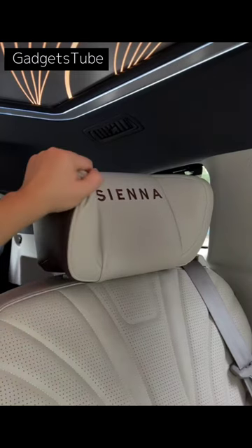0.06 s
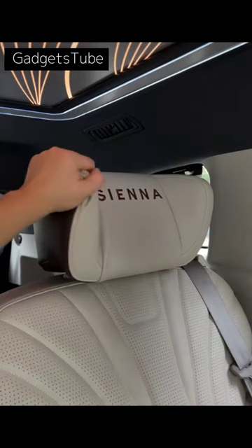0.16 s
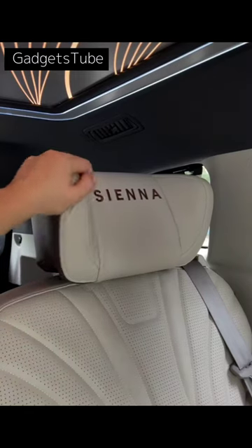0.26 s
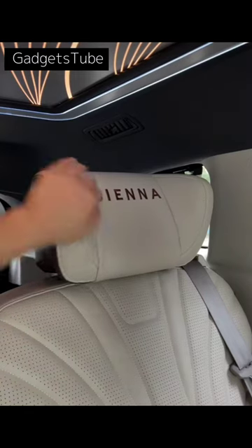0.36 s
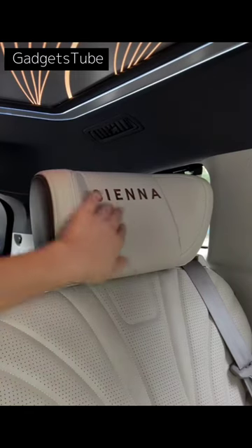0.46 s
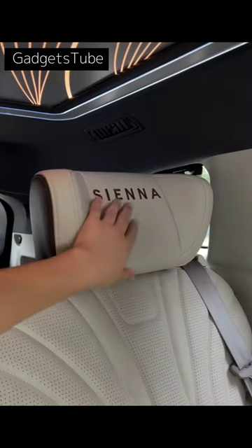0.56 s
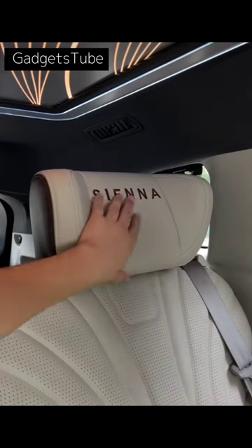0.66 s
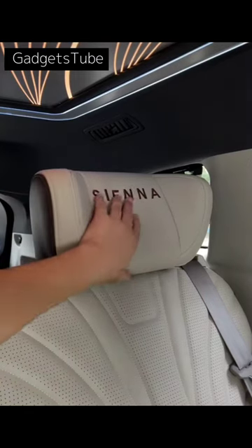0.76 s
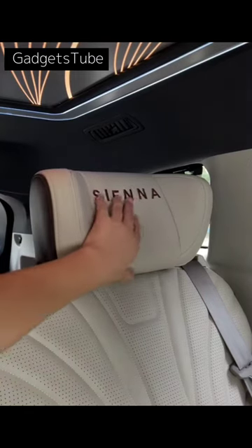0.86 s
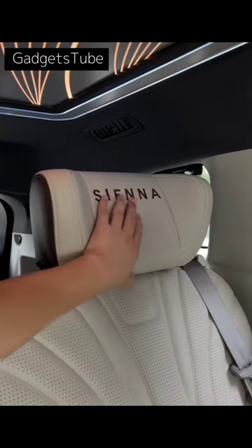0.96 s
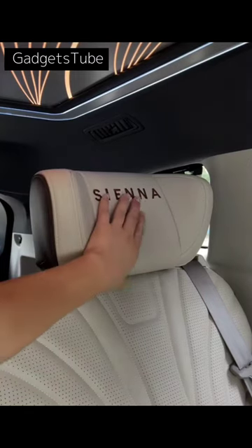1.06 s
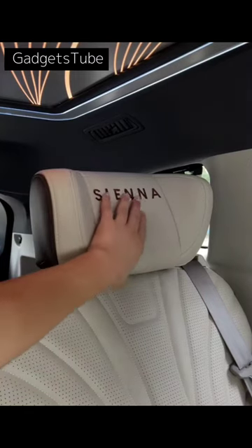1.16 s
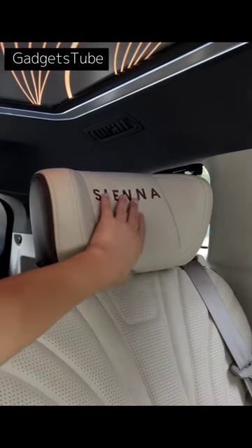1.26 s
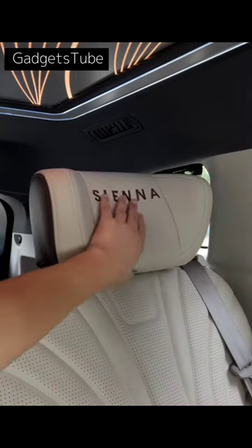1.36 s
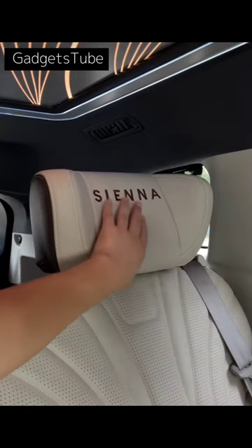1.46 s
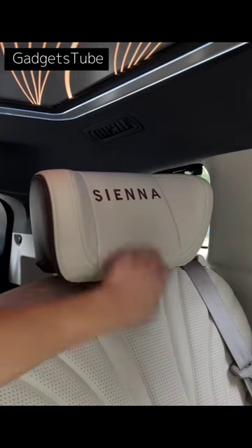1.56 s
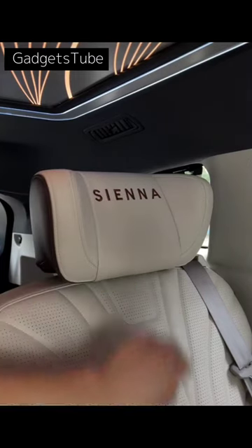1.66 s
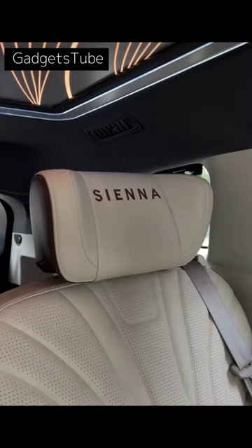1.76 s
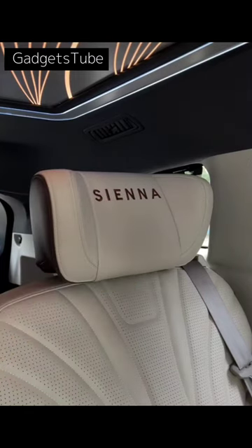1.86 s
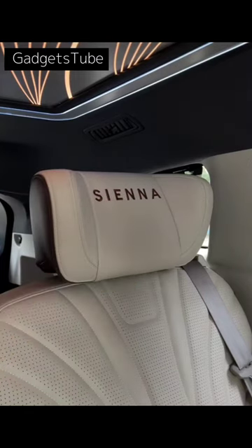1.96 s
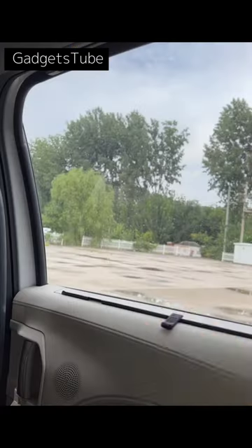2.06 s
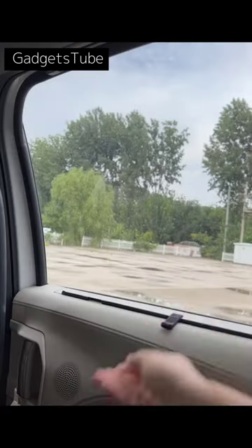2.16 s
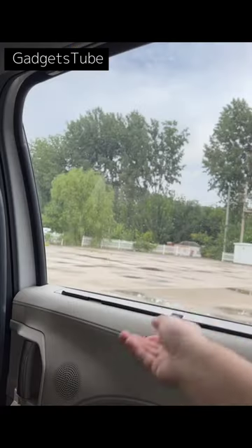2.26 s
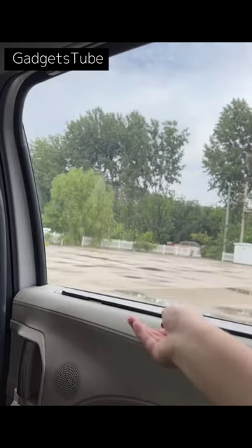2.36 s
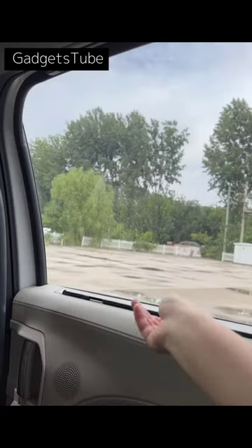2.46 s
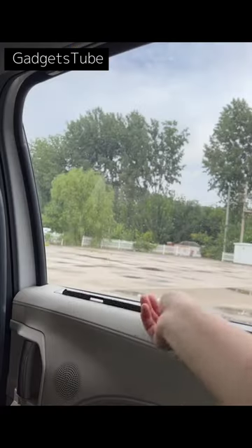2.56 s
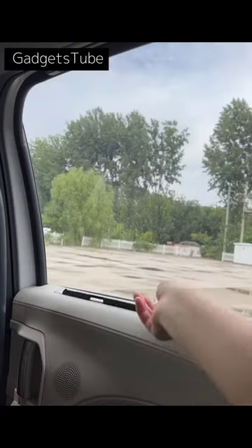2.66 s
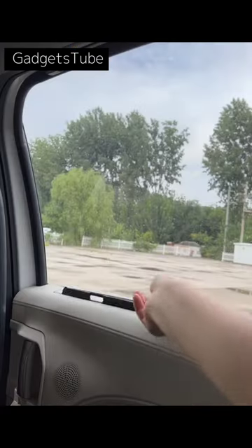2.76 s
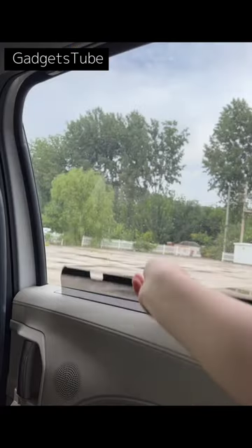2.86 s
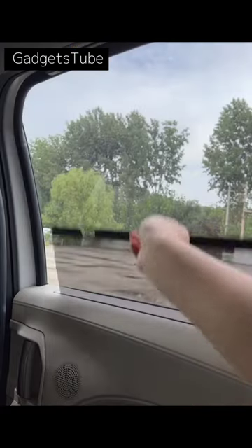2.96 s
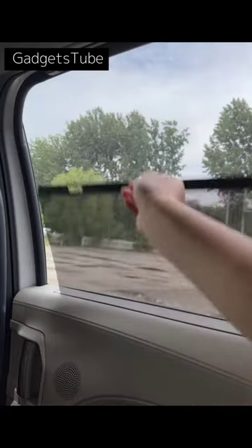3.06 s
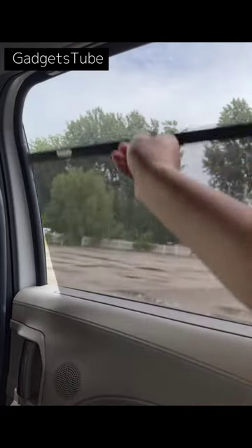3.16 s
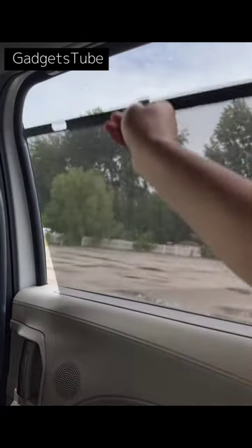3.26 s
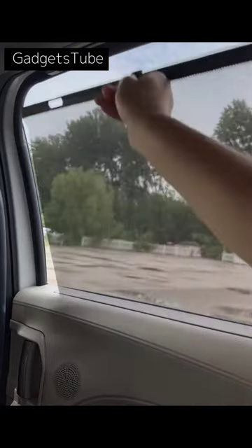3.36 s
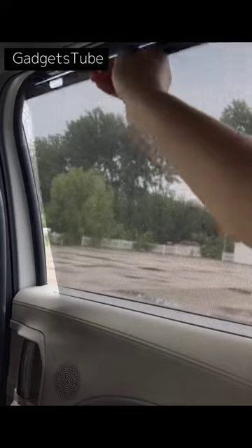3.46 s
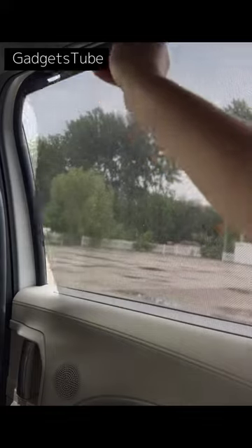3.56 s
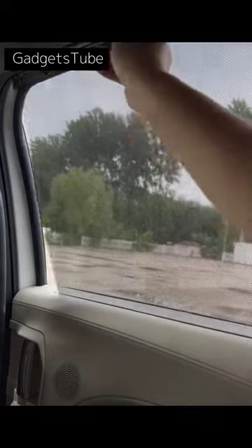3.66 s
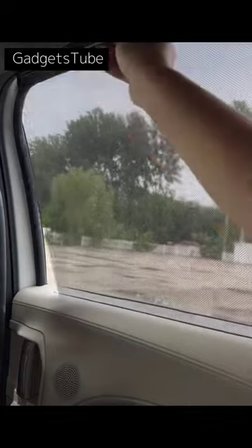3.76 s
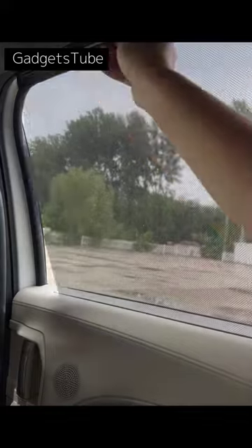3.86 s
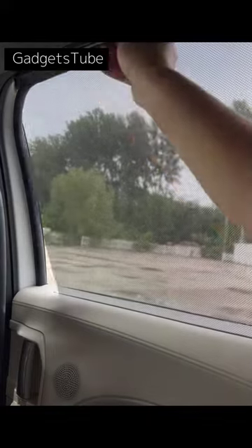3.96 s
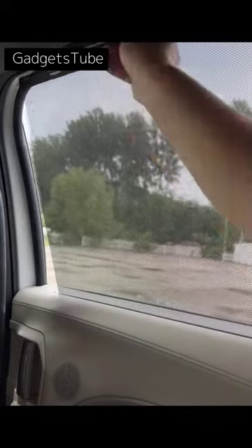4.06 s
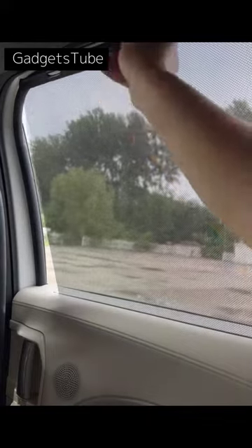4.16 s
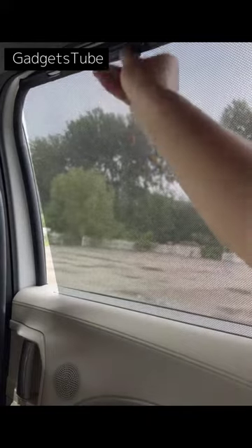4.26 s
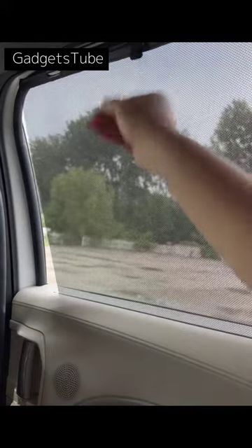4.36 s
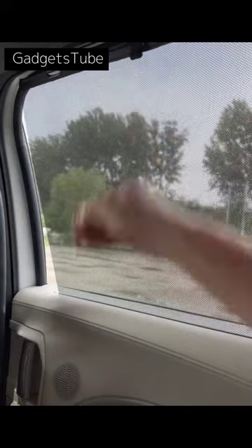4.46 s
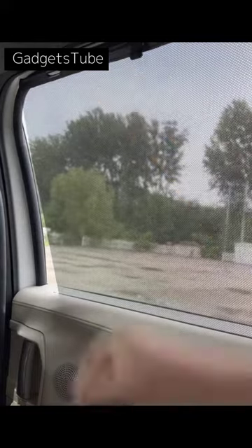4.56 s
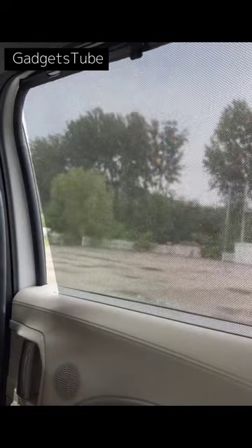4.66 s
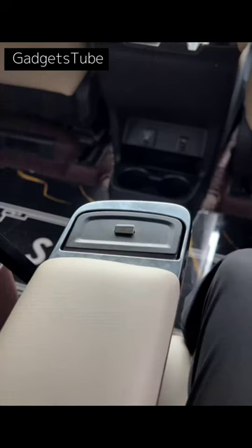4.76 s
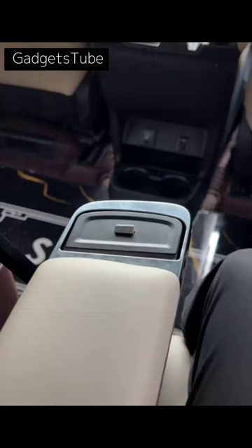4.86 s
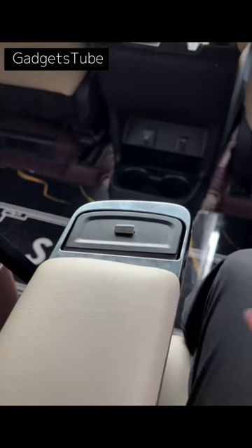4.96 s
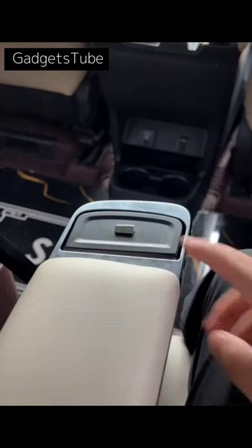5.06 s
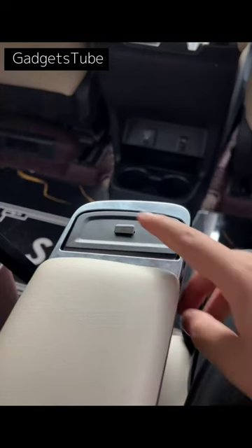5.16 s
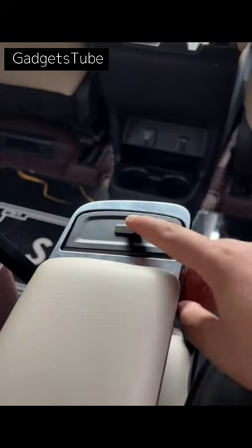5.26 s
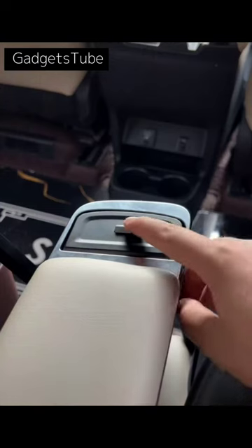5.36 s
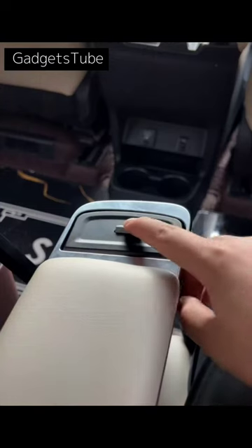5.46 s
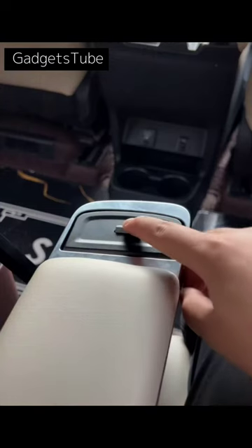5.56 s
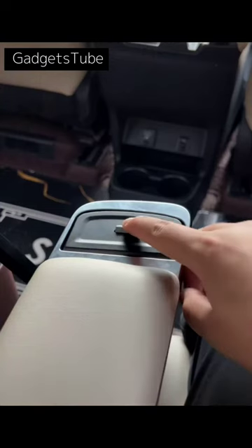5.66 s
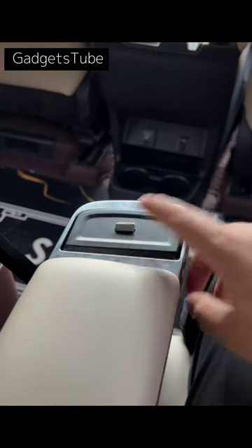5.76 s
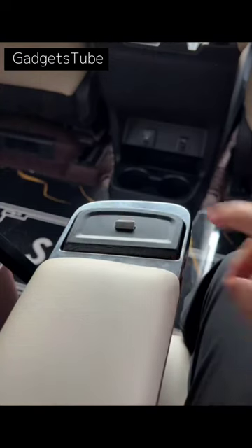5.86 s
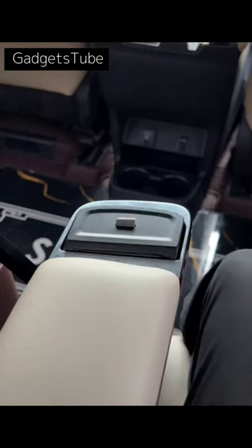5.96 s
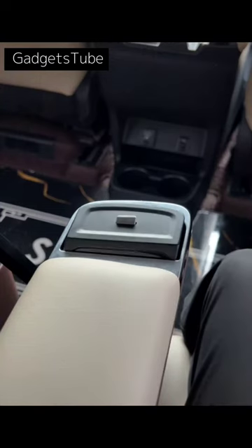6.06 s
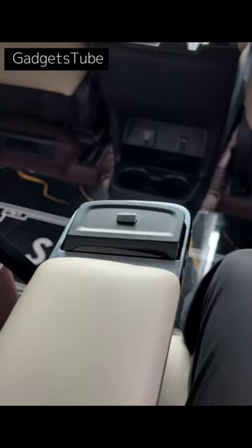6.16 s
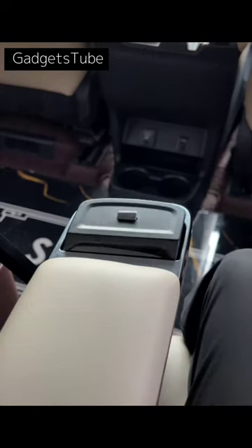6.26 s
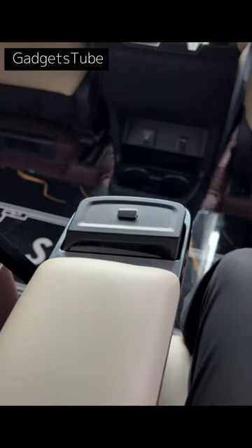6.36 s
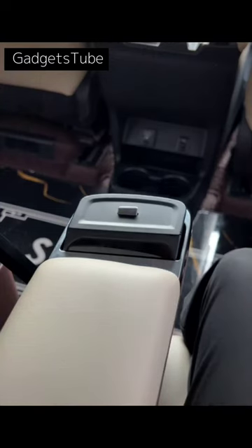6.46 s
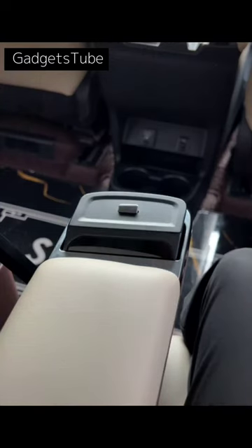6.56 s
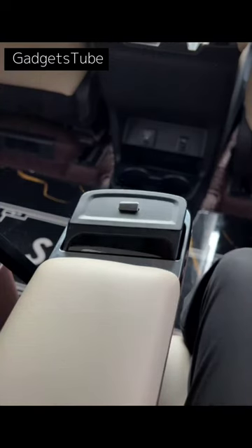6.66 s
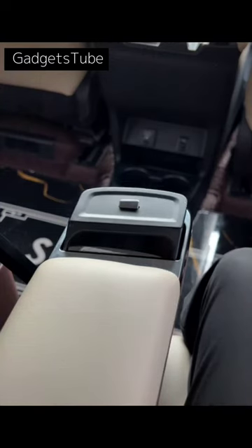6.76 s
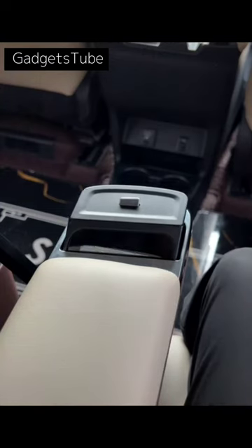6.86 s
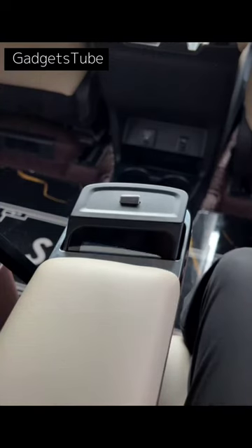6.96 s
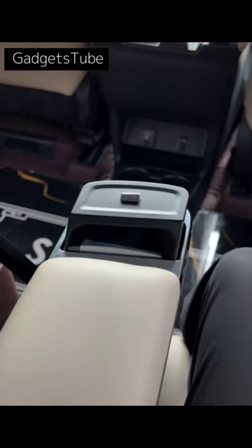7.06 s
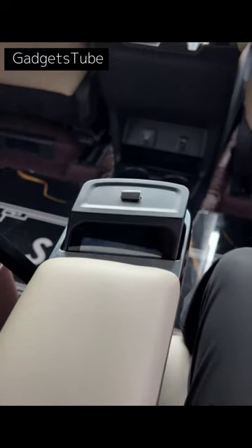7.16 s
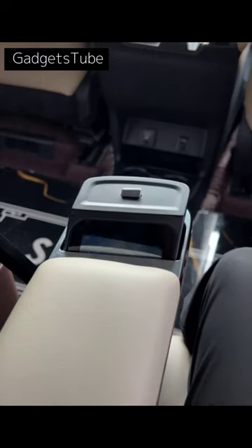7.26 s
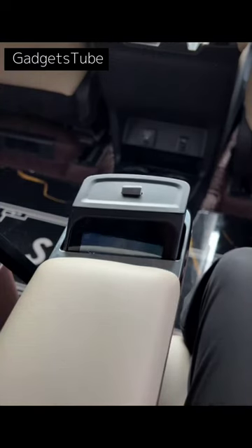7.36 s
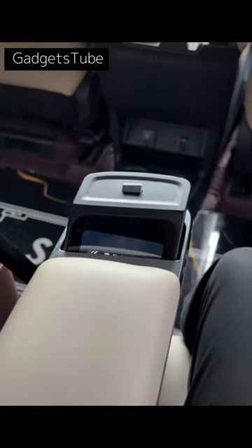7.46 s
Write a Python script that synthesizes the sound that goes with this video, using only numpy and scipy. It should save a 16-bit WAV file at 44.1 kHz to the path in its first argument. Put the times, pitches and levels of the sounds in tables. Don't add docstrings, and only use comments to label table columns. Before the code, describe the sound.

Inside a shut vehicle, close and dry with a very short padded echo, a low air boom lies under everything. From 0 to 2 seconds a hand slides over a leather headrest: a clear hiss around 0.3 to 0.6, then small ticks and soft padded thuds near 1.0 and 1.5. A tiny silent cut follows at 2.05. Knocks and low thumps at 2.3 to 2.7 mark fingers gripping a sunshade bar; from 2.8 to 3.6 mesh hisses upward over roller rumble and faint falling spring chirps. Bumps follow at 3.6 and 3.8, then the loudest hooking clack at 4.05, with light brushing afterward. Another cut comes at 4.75. A sleeve rustles faintly around 4.9; a button clicks at 5.6 and a latch snaps at 5.71. A small geared motor whines from 5.75 to the end, sagging slightly in pitch, with rubbery juddering and small squeaks between 6.0 and 6.9.

```python
import sys
import numpy as np
from scipy import signal
from scipy.fft import rfft, irfft, next_fast_len
from scipy.io import wavfile
from scipy.ndimage import uniform_filter1d

SR = 44100
rng = np.random.default_rng(int(sys.argv[2]) if len(sys.argv) > 2 else 0)


def bounce(signal):
    frames = np.transpose(np.atleast_2d(signal))
    limited = np.clip(frames, -1, 1)
    pcm = np.round(limited * 32767).astype(np.int16)
    wavfile.write(sys.argv[1], SR, pcm)


def makeup_ratio(level_db):
    decades = np.asarray(level_db, float) / 20
    return 10 ** decades


N = 331720
TIME = np.arange(N) / SR


def evened(x):
    return x / np.sqrt(np.mean(x ** 2) + 1e-20)


def read(points, hz):
    f, value = np.transpose(points)
    return np.interp(np.log(hz + 1), np.log(f + 1), value)


def track(rows, col, fade=0.003):
    s, db = np.transpose(rows)[[0, col]]
    inside_s = np.minimum(TIME - s[0], s[-1] - TIME)
    return makeup_ratio(np.interp(TIME, s, db)) * np.clip(inside_s / fade + 1, 0, 1)


def strokes_gain(rows, col, rise_s):
    t, rows = TIME[::32, None], np.array(rows)
    s, hold, fade = rows.T[:3]
    climb = np.maximum((s - t) / rise_s, 0) ** 1.5
    fall = np.maximum(t - s - hold, 0) / np.maximum(fade, 1e-3)
    each = makeup_ratio(np.maximum(rows[:, col] - 20 * (climb + fall), -200))
    return np.interp(TIME, t[:, 0], np.sqrt((each ** 2).sum(1)))


def wander(per_s):
    steps = rng.standard_normal(int(N / SR * per_s) + 2)
    return np.interp(TIME * per_s, np.arange(len(steps)), steps)


def sides(db):
    return makeup_ratio(np.array([[db], [-db]]) / 2)


def add(mix, s, sound):
    part = mix[:, round(s * SR):][:, :sound.shape[-1]]
    part += sound[..., :part.shape[1]]


# (frequency [Hz], likeness [0 to 1])
PORT_LIKENESS = [(130, 0.66), (290, 0.59), (600, 0), (1500, 0.91), (4000, 0), (5000, 0.063), (6500, 1),
                 (10500, 0)]


def noise(tone, span, size=512, patchy_db=2., grain_db=0., close=0.):
    start = max(round(span[0] * SR) - 500, 0)
    stop = min(round(span[1] * SR) + 500, N)
    hop, hz = size // 4, np.fft.rfftfreq(size, 1 / SR)
    a, b, c, d, patches = rng.standard_normal(((stop - start) // hop + 5, len(hz), 5)).T
    patches = evened(uniform_filter1d(uniform_filter1d(patches, size=6, axis=0), size=10, axis=1))
    likeness = np.clip(read(PORT_LIKENESS, hz), 0, 1)[:, None]
    same = 1 - (1 - likeness) * (1 - np.clip(close, 0, .8))
    left = a + 1j * b
    right = same * left + np.sqrt(1 - same ** 2) * (c + 1j * d)
    z = np.array([left, right]) * makeup_ratio(read(tone, hz)[:, None] + patchy_db * patches)
    x = signal.istft(z, nperseg=size, noverlap=size - hop)[1][:, :stop - start]
    grains = makeup_ratio(grain_db * wander(420)[start:stop])
    return np.pad(evened(x * grains), ((0, 0), (start, N - stop)))


def steadied(x, over_s=.12, share=0.47):
    width = int(over_s * SR)
    power = abs(uniform_filter1d(uniform_filter1d((x ** 2).mean(0), width), width))
    return evened(x / (power + .05) ** (share / 2)) / evened(x).std()


def rub(rows, rise_s, hiss, body, grain_db, close):
    span = rows[0][0] - 2 * rise_s, rows[-1][0] + rows[-1][1] + 2 * rows[-1][2]
    fine = noise(hiss, span, size=256, patchy_db=2.0, grain_db=grain_db, close=close)
    coarse = noise(body, span, patchy_db=1.8, grain_db=grain_db, close=close)
    return strokes_gain(rows, 3, rise_s) * fine + strokes_gain(rows, 4, rise_s) * coarse


# (from [s], to [s])
GAPS = [
    (2.05, 2.068),
    (4.749, 4.773),
]
# (frequency [Hz], level [dB])
BOOM_TONE = [
    [(35, -7.5), (65, 3.5), (95, -7.5), (128, 2.5), (165, -17), (270, -11.5), (440, -49), (1320, -120)],
    [(18, -47.5), (30, -35.5), (65, 4), (113, -8), (140, -11), (300, -31.5), (390, -64.5), (660, -120)],
    [(18, -43), (30, 8), (80, 5), (108, -7), (359, -33), (400, -36), (520, -36), (880, -120)],
]
REST_DB = [-36.5, -54.5, -53.5]
# (time [s], hold [s], fade by 20 dB [s], level [dB])
SHAKES = [
    (2.07, 0.0096, 0.13, -43),
    (2.44, 0.19, 0.22, -33.5),
    (2.98, 0.27, 0.18, -26),
    (3.33, 0.14, 0.48, -32),
    (3.86, 0.015, 0.053, -30),
    (4.12, 0.14, 0.17, -33),
    (4.74, 0.012, 0.022, -47.5),
    (5.15, 0.013, 0.067, -54),
]
# (frequency [Hz], level [dB])
HUSH = [(250, -4), (500, -11), (1300, -20), (1900, -15), (2600, -20), (9500, -27.5), (11000, -33.5),
        (12500, -76.5)]


def cabin_air():
    shaken = strokes_gain(SHAKES, col=-1, rise_s=0.17) + makeup_ratio(-17.5) * track(MOTOR_LOAD, 1)
    parts = np.r_[0, np.ravel(GAPS), N / SR].reshape(-1, 2)
    boom = 0
    for (a, b), db, tone in zip(parts, REST_DB, BOOM_TONE):
        air = steadied(noise(tone, (a - .2, b + 0.23), size=2048, patchy_db=2.0, close=0.98))
        during = (TIME >= a) & (TIME <= b + .008)
        boom = boom + during * np.hypot(makeup_ratio(db), shaken) * air
    return boom + makeup_ratio(-59.5) * noise(HUSH, (0, N / SR), patchy_db=0.0)


# (time [s], hold [s], fade by 20 dB [s], hiss level [dB], body level [dB])
LEATHER = [(0, 0.084, 0.17, -56.5, -52.5), (.27, 0.096, 0.45, -42, -42.5), (.47, 0.0048, 0.11, -34.5, -41),
           (.56, 0.13, 0.18, -49.5, -45.5), (1.03, 0.0052, 0.2, -48, -41.5),
           (1.14, 0.0091, 0.046, -55.5, -44.5), (1.27, .005, 0.08, -61, -43.5),
           (1.335, .01, 0.053, -59, -48), (1.425, .005, 0.028, -58, -47), (1.53, 0.0021, 0.035, -42.5, -30),
           (1.57, 0.024, 0.035, -36, -64)]
# (frequency [Hz], level [dB])
SKIN_HISS = [(710, -9.5), (1200, -11), (2650, -2.5), (4760, -5), (7630, -5.5), (11600, -18), (14000, -65)]
# (frequency [Hz], level [dB])
BODY = [(120, -17.5), (250, 8.5), (500, 2), (1000, -7), (1800, -13), (3500, -34.5)]


def hand_on_leather():
    return rub(LEATHER, 0.046, SKIN_HISS, BODY, grain_db=0.5, close=0.56)


# (time [s], peak [dB], fade by 60 dB [s], top frequency [Hz])
SNAPS = [(0.092, -41.5, 0.03, 2600), (0.22, -42, 0.013, 2500), (0.7945, -31.5, 0.012, 7800),
         (1.018, -38, 0.015, 5000), (0.978, -40, 0.022, 3470), (1.0106, -32, 0.043, 7650),
         (1.2493, -36, 0.011, 7500), (1.406, -37, 0.0076, 6000), (1.4116, -37.5, 0.028, 3000),
         (1.485, -36.5, 0.017, 2500), (1.5054, -30, 0.012, 4000), (2.357, -44, 0.011, 7000),
         (2.502, -35.5, .02, 6000), (2.676, -42, 0.017, 2170), (2.793, -51, 0.015, 2500),
         (3.807, -33, 0.01, 5000), (4.0455, -24.5, 0.009, 15000), (4.06, -28.5, 0.0074, 15380),
         (4.698, -53, 0.017, 2980), (5.711, -23.5, 0.009, 15100)]


def snaps():
    t, out = TIME[:1500], np.zeros((2, N))
    bursts = rng.standard_normal((len(SNAPS), len(t)))
    for burst, (s, db, t60, top_hz) in zip(bursts, SNAPS):
        crack = evened(signal.lfilter(*signal.butter(2, [900, top_hz], "band", fs=SR), burst))
        add(out, s, makeup_ratio(db - 7 - 60 * t / t60) * crack)
    return out


# (time [s], peak [dB], centre frequency
# [Hz], fade by 60 dB [s])
TICKS = [(0.795, -39, 3920, 0.027), (0.8, -53, 1820, 0.51), (.1, -44, 1960, 0.22),
         (1.322, -41.5, 1270, 0.067), (1.0082, -33, 1790, 0.024), (1.249, -47, 4100, 0.018),
         (1.34, -39, 1310, 0.023), (1.109, -38, 1000, 0.036), (1.4048, -40, 1350, 0.031),
         (1.506, -39, 1676, 0.032), (2.502, -19, 930, 0.025), (3.568, -22, 1050, 0.034),
         (2.544, -15, 1440, 0.011), (3.8204, -33, 1446, 0.025), (4.04, -19, 897, 0.033),
         (4.0609, -8.5, 1556, 0.021), (5.2996, -45, 1700, 0.033), (5.463, -34, 2600, 0.02),
         (5.596, -4, 1693, 0.02), (5.7105, -5, 2340, 0.061), (5.7117, -13, 1670, 0.053),
         (5.729, -10, 2320, 0.0093), (5.743, -10.5, 2160, 0.064),
         (2.844, -24.5, 1380, 0.024), (2.861, -19, 970, 0.043), (3.844, -35.5, 900, 0.048),
              (3.636, -40, 5200, 0.02), (3.804, -39, 6060, 0.014), (4.046, -26.5, 6700, 0.021),
              (4.0615, -5, 3520, 0.016), (5.421, -45, 1820, 0.076), (5.43, -34.5, 2780, 0.027),
              (5.444, -26, 2430, 0.024), (5.588, -33, 2454, 0.015), (5.704, -17, 1480, 0.071)]


def ticks():
    out, t, rows = np.zeros((2, N)), TIME[:5000], TICKS
    bursts = rng.standard_normal((len(rows), len(t)))
    for burst, (s, db, hz, t60) in zip(bursts, rows):
        wide = np.clip(1 + db / 60, .25, 1)
        band_hz = [hz / (1 + 1.13 * wide), min((1 + 0.62 * wide) * hz, 9000)]
        ring = signal.lfilter(*signal.butter(2, band_hz, "band", fs=SR), burst)
        edge = 0.44 * wide * uniform_filter1d(burst, size=3) * makeup_ratio(-60 * t / 0.0056)
        fading = makeup_ratio(-60 * t / t60) + 0.074 * makeup_ratio(-60 * t / (6.7 * t60))
        sound = (edge + ring * fading) * np.minimum(t / 0.001, 1)
        add(out, s, makeup_ratio(db) * sound / abs(sound).max())
    return out


# (time [s], peak [dB], panel frequency [Hz], fade by 60 dB [s])
KNOCKS = [(1.015, -11.5, 253, 0.03), (1.517, -15, 184, 0.055), (2.282, -31.5, 328, 0.045),
          (2.358, -18.5, 202, 0.1), (2.505, -15.5, 193, 0.07), (2.546, -3, 449, 0.026),
          (2.569, -13, 423, 0.037), (3.575, -8, 402.4, 0.04), (3.666, -9.5, 276, 0.076),
          (3.82, -12, 193, 0.041), (3.842, -13.5, 215, 0.032), (4.0448, 5.5, 241.6, 0.048),
          (4.0667, -4, 202.5, 0.061), (4.7, -23.5, 256, 0.025), (5.712, 1.5, 555, 0.019),
          (5.716, -5.5, 733, 0.066), (5.729, 4, 352, 0.017), (5.743, -12.5, 821, 0.06),
          (5.757, -11, 204, 0.067)]


def knocks():
    out, t = np.zeros((2, N)), TIME[:16000]
    modes = [(0.996, 0.97), (.7, 0.34), (1.393, 0.6), (2.25, 0.76)]
    for s, db, hz, t60 in KNOCKS:
        ring = sum(share * np.sin(2 * np.pi * hz * k * t) * makeup_ratio(-60 * k * t / t60) for k, share in modes)
        add(out, s, makeup_ratio(db + 1.5) * np.minimum(t / 0.004, 1) * ring)
    return out


# (time [s], peak [dB], frequency [Hz], fade by 60 dB [s])
PINGS = [
    (1.248, -43, 4090, 0.038),
    (3.638, -27, 5500, 0.017),
    (4.0465, -10, 6750, .012),
    (4.0615, -13, 4270, 0.026),
    (4.061, -13.5, 6070, 0.025),
    (4.065, -9, 1520, 0.018),
    (4.071, -18.5, 1796, 0.048),
    (4.077, -25, 6820, 0.02),
]


def pings():
    out, t = np.zeros((2, N)), TIME[:3000]
    for s, db, hz, t60 in PINGS:
        add(out, s, makeup_ratio(db - 60 * t / t60) * np.minimum(t / 0.00072, 1) * np.sin(2 * np.pi * hz * t))
    return out


# (time [s], hold [s], fade by 20 dB [s], hiss level [dB], body level [dB])
FABRIC = [(2.078, 0.02, 0.033, -44.5, -35), (2.45, .03, 0.04, -60, -45), (2.503, 0.0091, 0.12, -47, -34),
          (2.57, 0.081, 0.016, -51.5, -35), (2.69, 0.003, 0.023, -62, -41), (3.6, 0.043, 0.041, -46.5, -51),
          (3.664, 0.0054, 0.026, -39, -22.5), (3.822, 0.006, 0.05, -54, -34),
          (3.85, 0.0054, 0.028, -57, -47.5), (4.07, 0.0062, 0.021, -26, -24),
          (4.222, 0.004, 0.063, -49.5, -42.5), (4.29, 0.012, 0.022, -53.5, -53),
          (4.71, 0.0064, 0.019, -92, -44.5), (4.742, .005, .02, -50, -45)]
# (frequency [Hz], level [dB])
CLOTH_HISS = [(710, -20), (1200, -0.5), (3220, -6), (7480, -9.5), (11100, -28.5), (12600, -10.5),
              (14000, -55.5)]


def cloth_brushes():
    return rub(FABRIC, 0.028, CLOTH_HISS, BODY, grain_db=1.5, close=0.95)


# (time [s], peak [dB], frequency [Hz], fade by 60 dB [s])
THUMPS = [(2.371, -4, 106.4, 0.063), (2.507, -17, 530, 0.025), (5.6033, -29.5, 372, 0.062),
          (2.586, -4.5, 85, 0.033), (2.6454, -4, 94, 0.02), (3.583, -12, 102.8, 0.077),
          (3.665, 2, 203, 0.07), (3.63, -2, 198, 0.025), (3.569, -18, 1020, 0.032), (2.7, -25, 1100, 0.047),
          (2.858, -21.5, 622, 0.074), (3.82, -21.5, 780, 0.028), (5.44, -36.5, 216, 0.038),
          (5.61, -27, 217, 0.1), (3.75, -6.5, 92, 0.2), (3.74, -8.5, 64, 0.16), (4.052, -3.5, 112, 0.24),
          (4.1, -2.5, 76, 0.14), (4.1, -27, 71.2, 0.46), (4.101, -9, 109, 0.067), (4.1165, -9.5, 90.6, .06),
          (4.1306, 1, 87.6, 0.026), (4.712, -24, 157, 0.056), (4.732, -23.5, 99, 0.057),
          (4.688, -35, 385, 0.053), (5.758, -24, 119, 0.18)]


def thumps():
    out, t = np.zeros((2, N)), TIME[:16000]
    for s, db, hz, t60 in THUMPS:
        add(out, s, makeup_ratio(db - 60 * t / t60) * np.minimum(t / 0.0044, 1) * np.sin(2 * np.pi * hz * t))
    return out


# (frequency [Hz], fade by 60 dB [s])
CABIN = [(60, 0.22), (250, 0.21), (1000, 0.062), (8000, 0.085)]


def cabin(x):
    taps = np.zeros((2, 12000))
    at = np.arange(100, 11960, 20) + rng.integers(0, 20, (2, 593))
    np.put_along_axis(taps, at, rng.choice([-1., 1.], at.shape), 1)
    taps[1] = 0.91 * taps[0] + 0.59 * taps[1]
    hz, t, z = signal.stft(taps, SR, nperseg=256)
    dying = makeup_ratio(-60 * t / read(CABIN, hz)[:, None])
    bass_cut = np.minimum(hz / 450 + 0.06, 1)[:, None]
    tail = signal.istft(z * dying * bass_cut, SR, nperseg=256)[1]
    return signal.fftconvolve(x.mean(0)[None], tail / np.linalg.norm(tail[0]), axes=1)[:, :N]


# (time [s], level [dB])
PULL = [
    (2.79, -76),
    (2.824, -42),
    (2.9, -34),
    (2.97, -39.5),
    (3.05, -33),
    (3.2, -35),
    (3.5, -40),
    (3.6, -44.5),
]
# (time [s], hold [s], fade by 20 dB [s], level [dB])
ROLLER = [
    (2.83, 0.763, 0.033, -31),
    (2.86, 0.0056, 0.072, -30),
]
# (frequency [Hz], level [dB])
MESH_HISS = [(710, -17), (1200, -24), (2160, -4.5), (5010, -5), (8200, -11), (11300, -19.5), (12500, -18),
             (14000, -76)]
# (frequency [Hz], level [dB])
MESH_BODY = [(88, -2), (150, -1.5), (261, 2), (463, 2), (722, -5.5), (2000, -10), (2600, -12.5),
             (4400, -120)]


def shade():
    span = PULL[0][0] - .05, PULL[-1][0] + .05
    hiss = noise(MESH_HISS, span, size=256, patchy_db=0.0, grain_db=-5.0, close=1.0)
    rumble = noise(MESH_BODY, span, size=1024, patchy_db=1.5, grain_db=0.2, close=1.0)
    return track(PULL, 1) * hiss + strokes_gain(ROLLER, -1, rise_s=0.028) * rumble + chirps()


# (time [s], length [s], from frequency [Hz], to frequency [Hz], level [dB])
CHIRPS = [(3.017, .07, 610, 576, -41), (3.2, .09, 1170, 860, -47), (3.055, .06, 1170, 1060, -49),
          (3.1, .08, 1010, 960, -45), (3.12, .15, 510, 330, -46), (3.37, .054, 500, 460, -44),
          (3.42, .043, 445, 470, -45), (3.47, .042, 480, 440, -44), (3.4, .1, 701, 660, -51),
          (3.015, .045, 1850, 1800, -52), (3.05, .045, 1710, 1680, -51), (3.13, .04, 2150, 2090, -53),
          (3.19, .04, 2100, 2050, -52), (3.26, .07, 590, 560, -47), (3.175, .045, 830, 790, -47),
          (3.3, .07, 885, 860, -51), (3.12, .07, 1520, 1380, -54), (3.345, .05, 1740, 1710, -53),
          (3.335, .05, 2720, 2700, -56), (6.31, .035, 3440, 3400, -52), (6.22, .04, 3430, 3400, -56),
          (6.324, .05, 695, 685, -44), (6.74, .05, 1140, 1130, -55), (5.08, .18, 2050, 1950, -78)]


def chirps():
    out, tremble = np.zeros((2, N)), 1 + .007 * wander(150)
    for s, length, from_hz, to_hz, db in CHIRPS:
        hz = np.linspace(from_hz, to_hz, int(length * SR))
        hz = hz * tremble[round(s * SR):][:len(hz)]
        whistle = np.sin(2 * np.pi * np.cumsum(hz) / SR)
        add(out, s, makeup_ratio(db + 15) * np.hanning(len(hz)) * whistle)
    return out * makeup_ratio(2 * wander(60))


# (time [s], hold [s], fade by 20 dB [s], hiss level [dB], body level [dB])
SLEEVE = [
    (4.79, 0.024, .08, -62, -82),
    (4.9, 0.085, 0.2, -50.5, -80),
    (5.03, 0.048, 0.1, -57, -81),
]
# (frequency [Hz], level [dB])
SLEEVE_HISS = [(700, -11.5), (1700, -3.5), (2600, -6), (4500, -8), (7000, -3), (9500, -9.5), (11600, -13),
               (14000, -70)]


def sleeve():
    return rub(SLEEVE, 0.051, SLEEVE_HISS, BODY, grain_db=-2.0, close=0.2)


# (time [s], speed [turns per s])
SPEED = [(5.8, 86.6), (6.6, 85.9), (7.2, 84.9), (7.52, 83.6)]
# (time [s], level [dB])
MOTOR_LOAD = [
    (5.75, -38),
    (5.85, -33),
    (6.3, -28),
    (6.9, -30),
    (7.52, -32),
]
# (multiple, level [dB])
FREE = [(1, -15), (2, -2.5), (3, -35), (4, -1), (5, -31), (6, -10), (7, -13.5), (8, -9), (9, -26),
        (10, -5.5), (11, -41), (12, -22.5), (13, -17), (14, -16), (15, -20), (16, -12), (17, -14), (18, -8),
        (19, -8.5), (20, -8), (21, -18.5), (22, -20), (23, -9), (24, 1.5), (25, -17.5), (26, -25),
        (27, -9.5), (28, -12), (29, -10), (30, -12.5), (31, -16), (32, -25), (33, -13), (34, -19),
        (35, -30), (36, -15.5), (37, -31), (38, -37), (39, -36), (40, -38), (41, -43), (42, -45)]
# (multiple, level [dB])
LOADED = [(1, -24), (2, -7.5), (3, -44), (4, 2), (5, -42), (6, -19), (7, -13.5), (8, -22.5), (9, -12.5),
          (10, -22), (11, -17.5), (12, -21.5), (13, -27), (14, -40), (15, -35.5), (16, -25), (17, -20.5),
          (18, -10), (19, -29), (20, -16.5), (21, -14), (22, -20), (23, -24.5), (24, -4.5), (25, -17),
          (26, -35), (27, -25), (28, -25), (29, -13), (30, -20), (31, -21), (32, -36), (33, -24), (34, -28),
          (35, -36), (36, -20), (37, -33), (38, -23), (39, -47), (40, -37), (41, -32), (42, -24)]
# (multiple, level [dB])
WHINE = [(48, -29.5), (61, -49), (64, -31.5), (66, -31.5), (102, -34.5), (106, -32.5), (107, -33),
         (108, -36), (114, -40)]
# (frequency [Hz], level [dB])
GEARS = [(130, -13), (339, -8.5), (446, -17.5), (1190, -21.5), (2060, -18), (2400, -24), (9700, -44),
         (11000, -52.5)]


def motor():
    speed = np.interp(TIME, *np.transpose(SPEED)) * (1 + 0.001684 * wander(30))
    turns = np.cumsum(speed) / SR
    live = slice(round(MOTOR_LOAD[0][0] * SR) - 400, N)
    strain = np.interp(TIME[live], (5.65, 7.1), [0, 1])
    orders = []  # (multiple, level in dB, unsteadiness, looseness)
    for (k, free_db), (_, loaded_db) in zip(FREE, LOADED):
        orders.append((k, (free_db - 5) * (1 - strain) + (loaded_db - 1) * strain, 1., 1.))
    for k, db in WHINE:
        orders.append((k, db + 1.4 * (strain - 1), 2, .8))
    tones = teeth(turns) * makeup_ratio(2.0 * wander(25))
    for k, db, unsteady, loose in orders:
        waver = makeup_ratio(db + 1.3 * unsteady * wander(40)[live])
        slip = .0032 * loose * k * wander(100)[live]
        tones[live] += waver * np.sin(2 * np.pi * (k * turns[live] + slip + rng.random()))
    beat = 1 + 0.12 * np.cos(4 * np.pi * turns)
    grind = noise(GEARS, (MOTOR_LOAD[0][0], N / SR), size=1024, patchy_db=4.5, close=0.28)
    return track(MOTOR_LOAD, 1) * (tones * sides(0.95) + makeup_ratio(-7.5) * beat * grind)


def teeth(turns):
    k = np.arange(1025)
    level = makeup_ratio(-45.5 - 0.1144 * (k - 30)) * (k > 42) * (k < 100)
    chance = rng.standard_normal(len(k)) + 1j * rng.standard_normal(len(k))
    pattern = irfft(1024 * level * chance)
    return np.interp(turns % 1, np.arange(len(pattern)) / len(pattern), pattern, period=1)


# (time [s], hiss level [dB], body level [dB])
DRAG = [(6.03, -48, -37), (6.136, -39, -35.5), (6.185, -39.5, -54), (6.234, -39, -34),
        (6.331, -44.5, -33.5), (6.44, -47, -35), (6.52, -51, -34), (6.648, -51.5, -33.5),
        (6.76, -68, -36.5), (6.848, -64, -41.5)]
# (frequency [Hz], level [dB])
SEAL = [
    [(1200, -16), (2500, -8), (3100, -2), (3450, -2), (4000, -8.5), (8000, -12), (10500, -18), (15500, -81)],
    [(250, -23.5), (450, 8.5), (700, 9.5), (900, 6), (1150, -6.5), (1800, 10), (3000, -48)],
]
# (frequency [Hz], width [Hz], level [dB])
SQUEAL = [(693, 30, -4.5), (837, 50, -8.5), (1145, 33, -13), (2600, 130, -8.5), (3114, 31, -14),
          (3350, 60, -13.5), (4760, 170, -23)]


def seal():
    rise_s, hold_s, fade_s = .03, 0.006, 0.14
    rows = [(s, hold_s, fade_s, *db) for s, *db in DRAG]
    live, rings = slice(round(MOTOR_LOAD[0][0] * SR), N), np.zeros(N)
    for hz, width, db in SQUEAL:
        ring = signal.lfilter(*signal.iirpeak(hz, hz / width, SR), rng.standard_normal(N - live.start))
        rings[live] += makeup_ratio(db + 2.1 * wander(15)[live]) * evened(ring)
    drag = rub(rows, rise_s, *SEAL, grain_db=1.0, close=0.83)
    return drag + strokes_gain(rows, 4, rise_s) * rings


def scene():
    hits = snaps() + ticks() + knocks() + pings() + thumps()
    rubbing = hand_on_leather() + cloth_brushes() + sleeve()
    lid = motor() + seal()
    return cabin_air() + rubbing + hits + makeup_ratio(-7.5) * cabin(hits) + shade() + lid


def top_cut(x):
    return signal.sosfilt(signal.butter(12, 15710, fs=SR, output="sos"), x)


# (frequency [Hz], phase [radians])
LEAD = [(0, 0), (780, -.5), (4200, -.3), (4820, -1.5), (5340, -5.7), (5800, -6.2), (8600, -6.4),
        (10800, -9.42)]
# (frequency [Hz], level [dB])
LEAN = [(100, 4), (400, 1), (3000, 0)]
# (frequency [Hz], level [dB])
PORT_GAP = [(70, -19.5), (400, 5), (5300, -1.5), (5900, -4.5), (7400, -51.5), (8000, -1), (15400, 1.5),
            (15900, -36.5)]


def record(dry):
    size = next_fast_len(N + 4096)
    hz = np.fft.rfftfreq(size, 1 / SR)
    lead = np.interp(hz, *np.transpose(LEAD)) * np.array([[.5], [-.5]])
    left, right = rfft(dry, size) * np.exp(1j * lead) * sides(read(LEAN, hz)).reshape(2, -1)
    low_cut = 1 / np.sqrt(1 + (48 / (hz + 1)) ** 6)
    high_cut = 1 / np.sqrt(1 + (hz / 11200) ** 16)
    mid = (left + right) / 2 * low_cut * high_cut
    side = (left - right) / 2 * low_cut * makeup_ratio(read(PORT_GAP, hz))
    ports = irfft([mid + side, mid - side], size)[:, :N]
    limited = np.clip(1.289 * np.tanh(ports / 1.163), -1, 1)
    for a, b in GAPS:
        fade_out, fade_in = (a - TIME) / 0.002, (TIME - b) / 0.0094
        limited = limited * np.clip(np.maximum(fade_out, fade_in), 0, 1)
    return top_cut(limited)


dry = scene()
out = record(dry)
bounce(out)
```